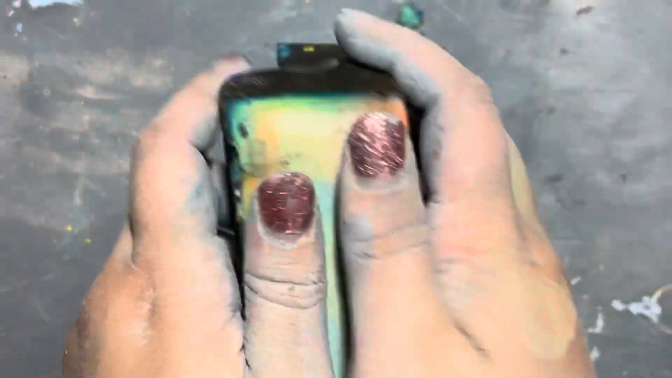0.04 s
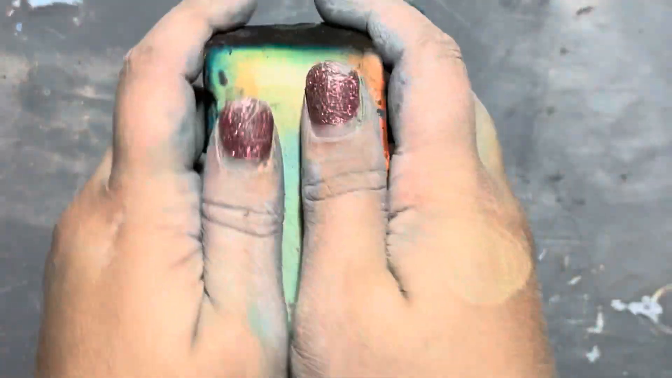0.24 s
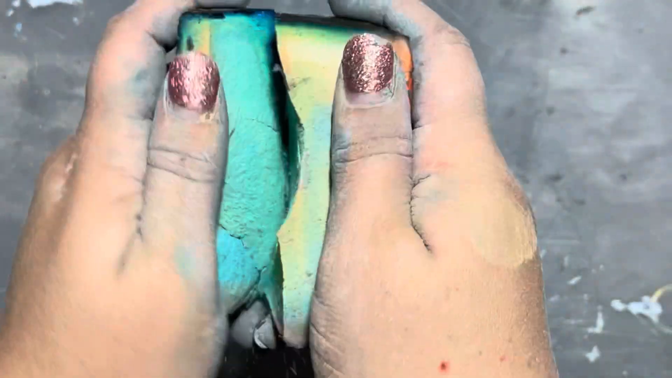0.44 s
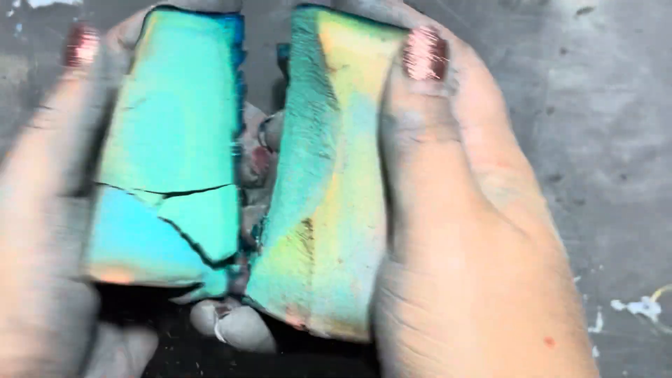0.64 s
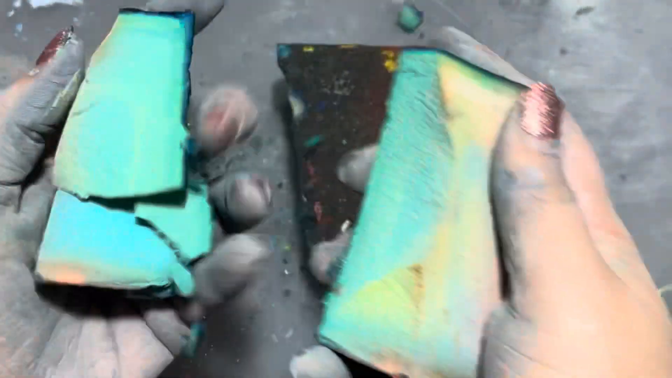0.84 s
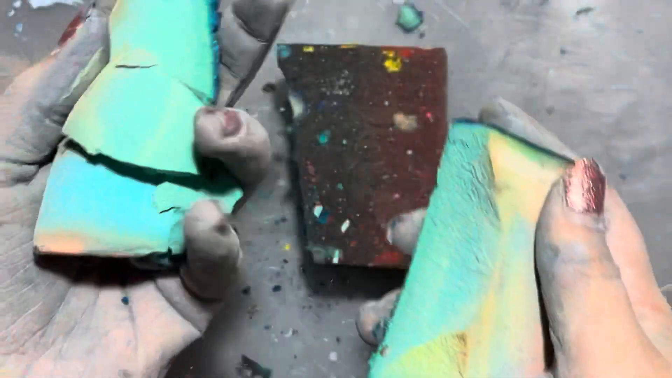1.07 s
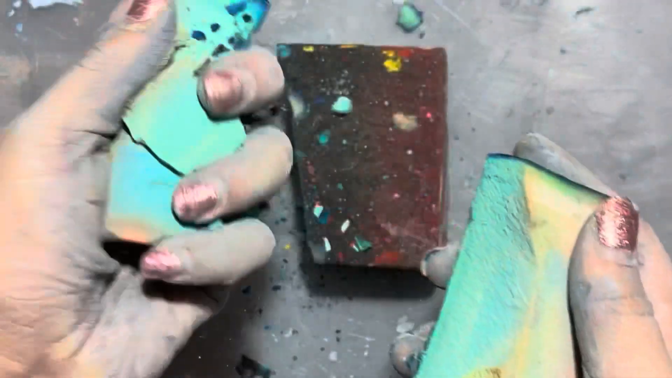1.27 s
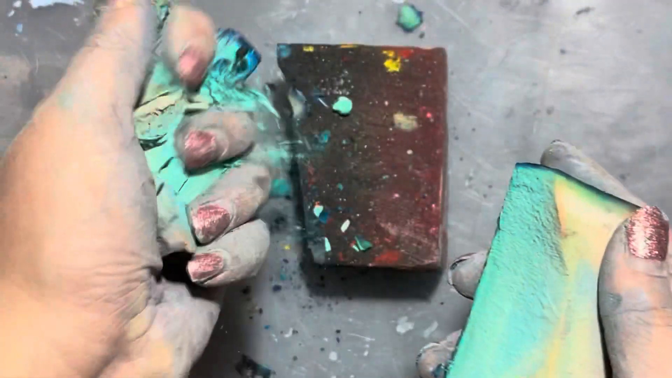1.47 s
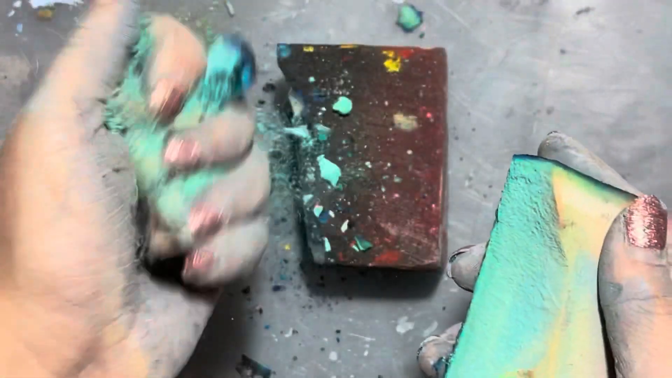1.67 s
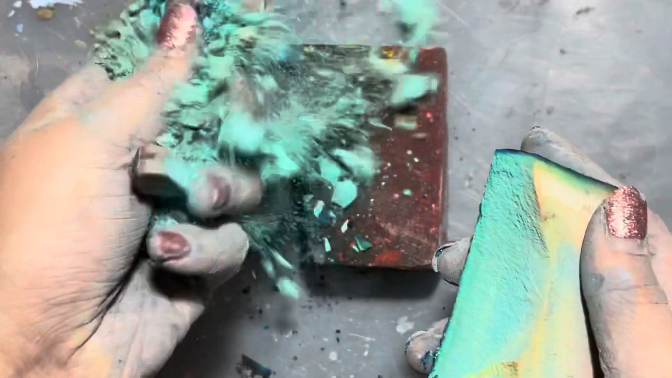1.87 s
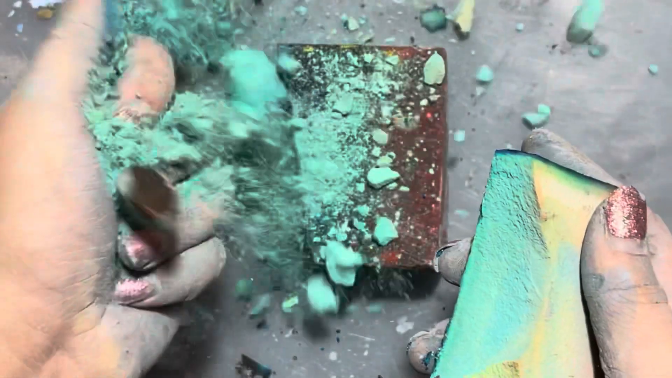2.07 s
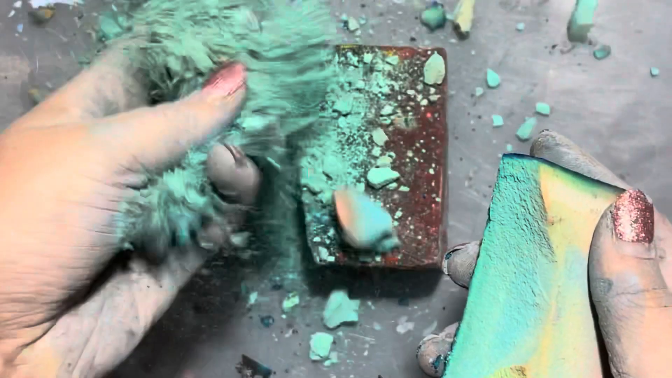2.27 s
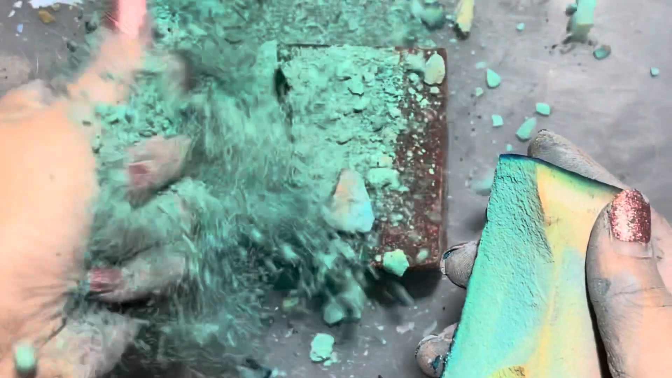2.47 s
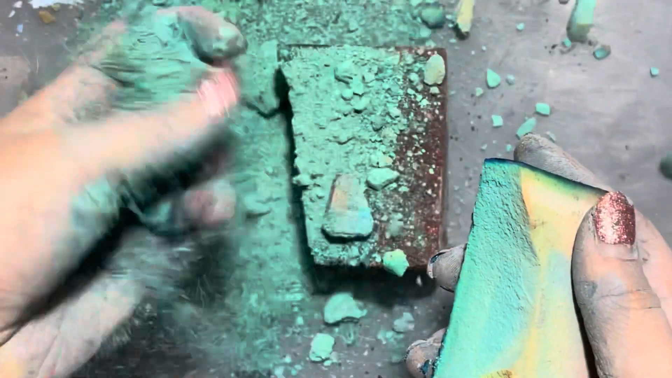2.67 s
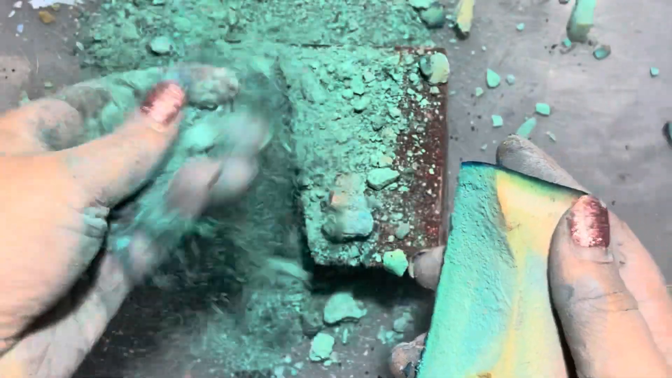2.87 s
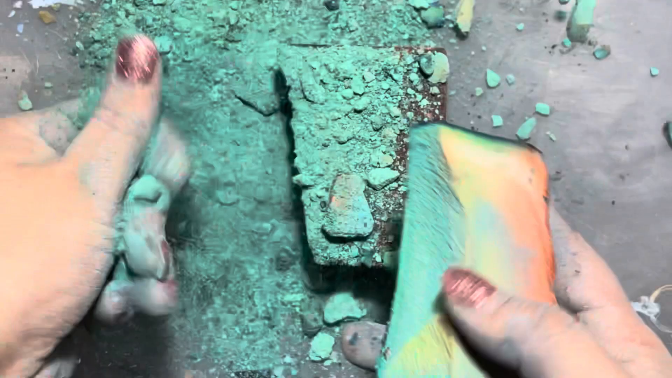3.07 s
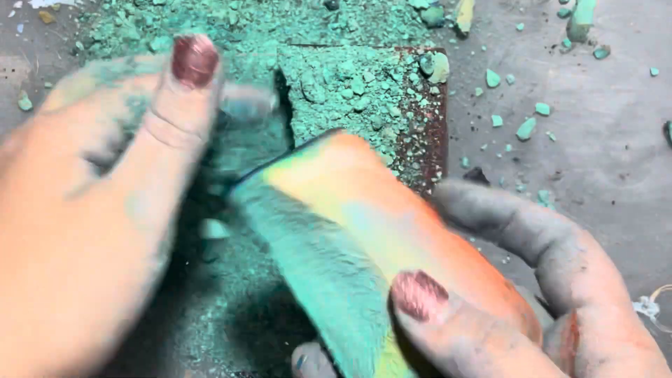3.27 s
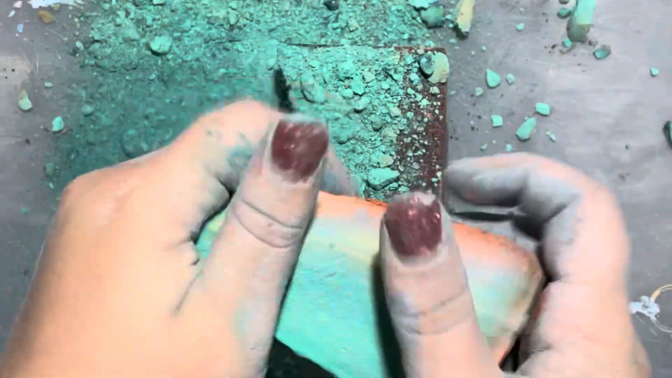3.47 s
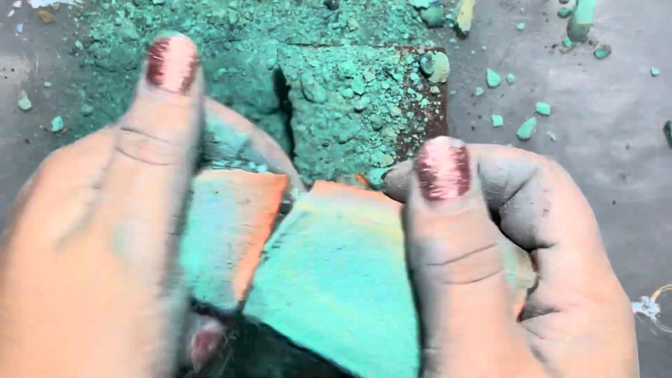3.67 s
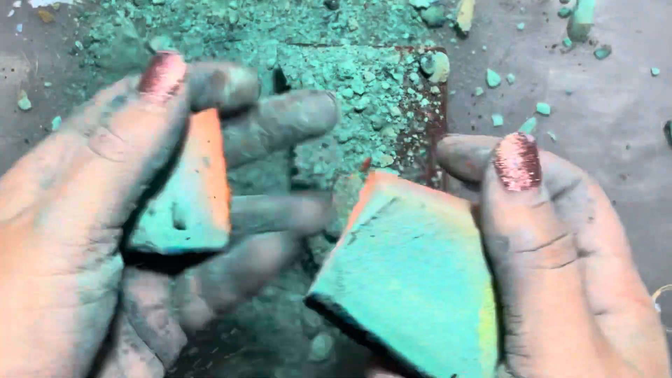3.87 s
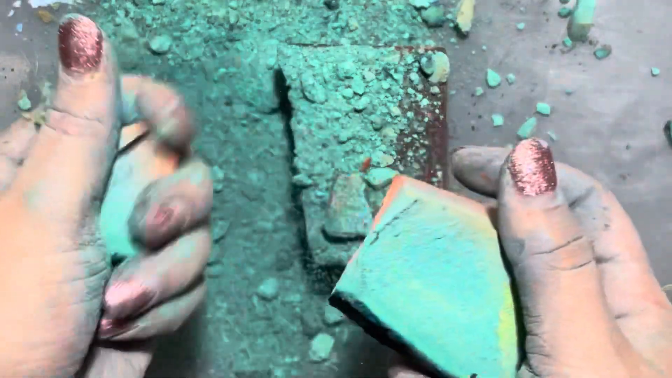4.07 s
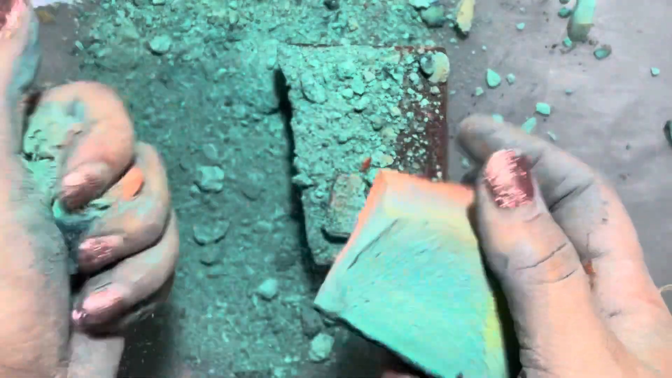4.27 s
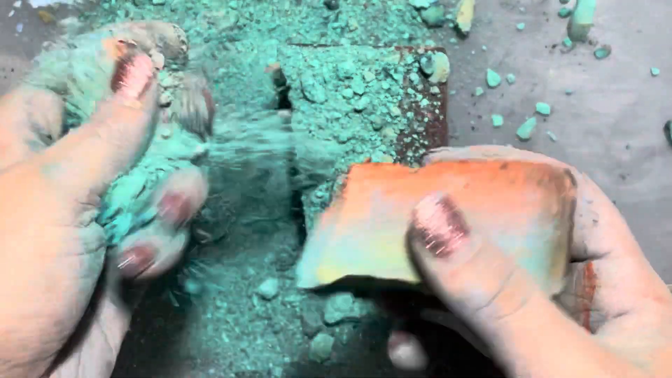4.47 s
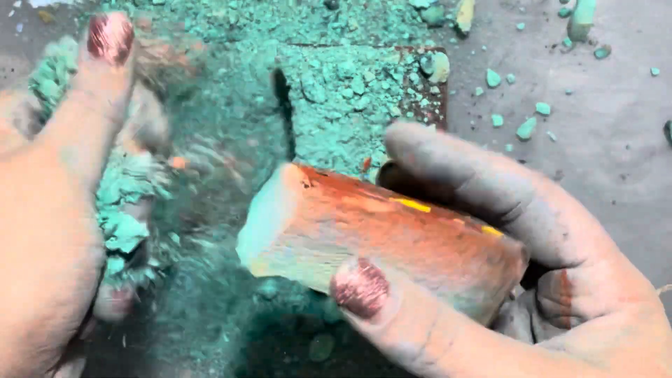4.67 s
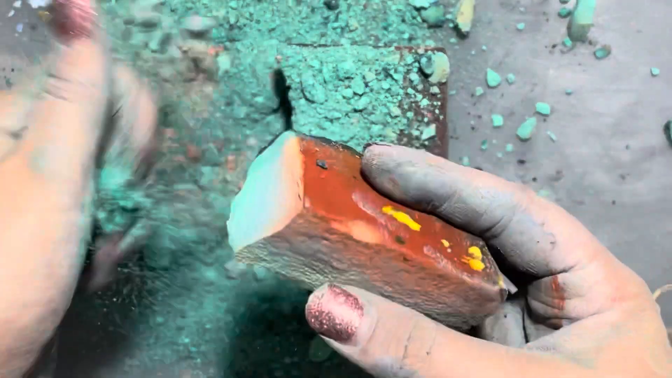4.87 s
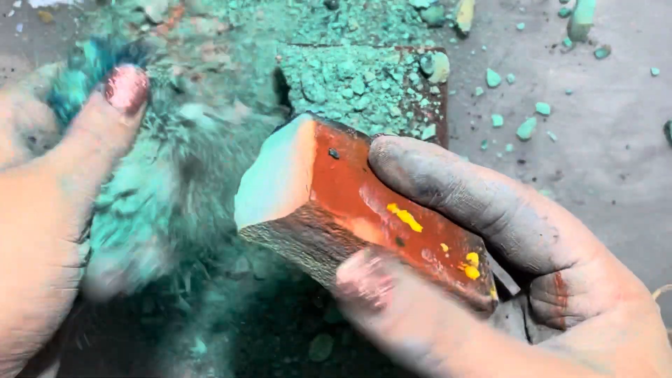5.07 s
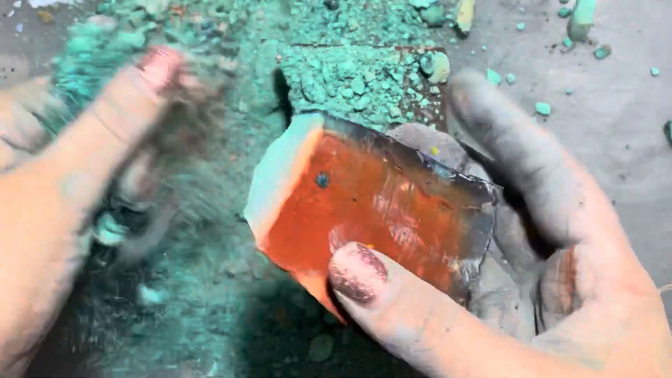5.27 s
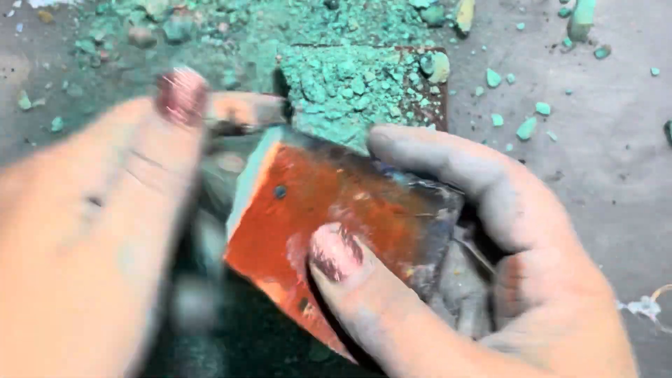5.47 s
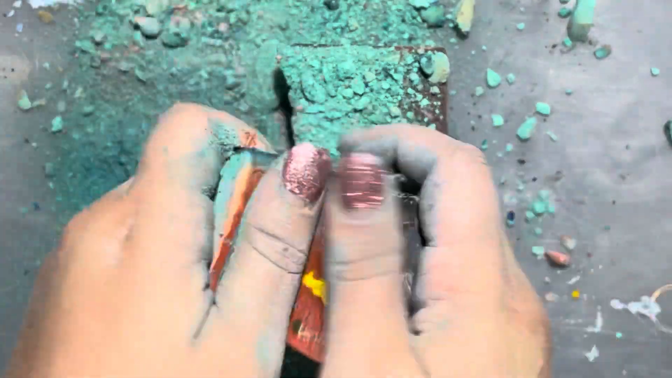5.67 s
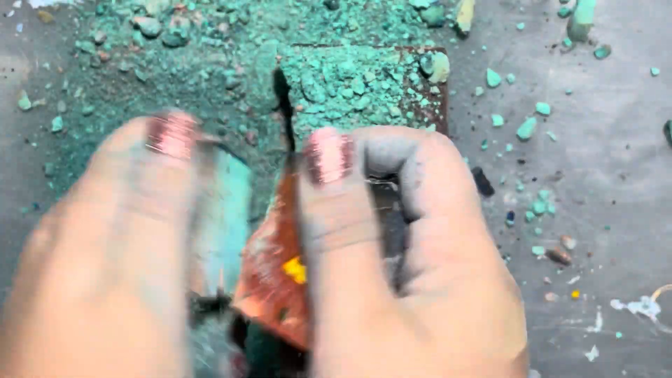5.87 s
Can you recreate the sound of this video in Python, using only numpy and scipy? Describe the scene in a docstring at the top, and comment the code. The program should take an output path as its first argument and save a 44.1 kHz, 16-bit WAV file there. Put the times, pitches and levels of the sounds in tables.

```python
"""A faint low hum and a squeaking swish of skin on chalk come first, then dry blocks snap and crush by hand.
It happens over a table, close to a phone in a small room. Each fracture is a short burst of tiny breaks that
rings the piece; lumps thump as low damped modes; crumbs patter and powder hisses as showers of random clicks;
fingers swish as shaped grain noise. The hum, a wavering sine with an octave, mostly sinks in pitch as it
grows louder on the whole."""
import sys
import numpy as np
from scipy import signal
from scipy.fft import rfft, irfft, next_fast_len
from scipy.io import wavfile
from scipy.ndimage import uniform_filter1d

SR = 44100
rng = np.random.default_rng(int(sys.argv[2]) if len(sys.argv) > 2 else 0)


def log_audio(samples):
    """Write samples as a 16-bit WAV file to the path given in sys.argv[1]."""
    # one column per channel
    frames = np.atleast_2d(samples).T
    # limit to full scale, then quantise
    limited = np.clip(frames, -1, 1)
    pcm = np.round(limited * 32767).astype(np.int16)
    wavfile.write(sys.argv[1], SR, pcm)


N = 261072
TIME = np.arange(N) / SR


def undb(db):
    """Decibels to gain."""
    return 10 ** (np.asarray(db) / 20)


def unit(x):
    """The same sound at rms 1."""
    return x / np.sqrt(np.mean(x ** 2) + 1e-30)


def strength(sound, db):
    """Scale a short sound so that its energy, spread over 10 ms, has this level."""
    return sound * undb(db) * np.sqrt(0.01 * SR / np.sum(sound ** 2))


def curves(table):
    """Every column of a table of (s, value, ..) rows, sample by sample."""
    s, *columns = np.transpose(table)
    return [np.interp(TIME, s, c) for c in columns]


def add(track, s, sound):
    """Mix a sound into the track at time s."""
    start = max(int(s * SR), 0)
    track[start:start + len(sound)] += sound[:max(N - start, 0)]


def colour(x, spectrum, ring_hz=1000, ring_db=0, ring_octaves=0.23, size=2048):
    """Causal minimum-phase filter with the given spectrum and one optional resonance."""
    octave = np.log2(np.maximum(np.arange(size // 2 + 1) * SR / size, 1))
    hz, db = np.transpose(spectrum)
    base = np.interp(octave, np.log2(hz), db)
    resonance = ring_db / (1 + ((octave - np.log2(ring_hz)) / ring_octaves) ** 2)
    # folding the cepstrum forward in time makes the response causal
    cepstrum = irfft(np.log(undb(base + resonance)))
    cepstrum[1:size // 2] *= 2
    cepstrum[size // 2 + 1:] = 0
    response = irfft(np.exp(rfft(cepstrum)))
    return signal.fftconvolve(x, response)[:len(x)]


def walk(rate):
    """Smooth random wander with a spread near 1, taking this many steps per second."""
    steps = rng.standard_normal(N // 20)
    held = steps[(TIME * rate).astype(int)]
    return 1.3 * uniform_filter1d(held, max(int(SR / rate), 1))


def grains(rate, spread_db):
    """Random clicks, this many per second on average, many small and a few large."""
    chance = rng.random(N)
    size = np.minimum(rng.exponential(size=N), 4)
    sign = rng.choice([-1, 1], N)
    return unit((chance < rate / SR) * undb(spread_db * size) * sign)


def gesture(start, length, attack_s, release_s, sag_db_per_s):
    """Rise to full strength at the start, sag slowly while held, then die away."""
    since = TIME - start
    rise = np.exp(-(np.minimum(since, 0) / attack_s) ** 2)
    sag = undb(-sag_db_per_s * np.clip(since, 0, length))
    release = np.exp(-np.maximum(since - length, 0) / release_s)
    return rise * sag * release


# Spectrum of the empty room. Each row: frequency in Hz, level in dB per Hz.
ROOM_TONE = [(20, 0.5), (45, -13), (70, -10.5), (100, -1.5), (200, -17.5), (400, -27.5), (900, -51.5),
             (2500, -48), (11000, -39), (13000, -55), (16000, -86)]


def room_tone():
    """A steady noise bed: random noise through the room's own spectrum."""
    return unit(colour(rng.standard_normal(N), ROOM_TONE)) * undb(-68)


# The hum's glide. Each row: time in seconds, pitch in Hz, level in dB before the trim.
HUM = [(0.1, 72.1, -68), (2.14, 71.57, -57), (3.08, 70.8, -60), (3.97, 68.9, -54.5), (4.06, 68.6, -59),
       (4.67, 67.33, -48), (5.79, 66.9, -45.5), (5.92, 68.4, -46)]


def hum(trim_db=-1, beat_hz=64.2, beat_db=-68, second_db=-20):
    """A low hum with a weak octave, unsteady in pitch and level; a fainter steady tone beats against it."""
    hz, db = curves(HUM)
    phase = 2 * np.pi * np.cumsum(hz + 0.78 * walk(19)) / SR
    level = undb(db + trim_db + 0.88 * walk(6.5))
    tone = (np.sin(phase) + undb(second_db) * np.sin(2 * phase)) * level
    steady = undb(beat_db) * np.sin(2 * np.pi * beat_hz * TIME)
    return np.sqrt(2) * (tone + steady)  # sine levels count as rms


# Spectrum of broken chalk pieces. Each row: frequency in Hz, level in dB per Hz.
BODY = [(100, 0.5), (300, -11.5), (700, 0), (1300, -2.5), (2400, -1.5), (3800, -5.5), (5000, -15),
        (9000, -59), (16000, -95)]


def chips(rate=130, low_hz=700, high_hz=4500, spread_db=4.5, size=1024):
    """Single chips break off at random moments, each with a pitch of its own."""
    out, t = np.zeros(N), np.arange(size) / SR
    for when, pitch, weight in rng.random((int(rate * N / SR), 3)):
        hz = low_hz * (high_hz / low_hz) ** pitch
        burst = rng.standard_normal(size) * np.exp(-t / 0.0015)
        tick = colour(burst, BODY, hz, ring_db=13, size=512)
        # few chips are loud, and high ones are weaker
        db = -spread_db * np.log(weight + 0.071) - 4 * pitch
        add(out, when * N / SR, strength(tick, db))
    return unit(out)


def crumbs(spectrum, low_hz, high_hz, rate, spread_db, ring_db, flicker_db, count=6):
    """Crumbs of several sizes; each size clicks at its own pitch and comes in its own flurries."""
    total = np.zeros(N)
    for hz in np.geomspace(low_hz, high_hz, count):
        flurries = grains(rate / count, spread_db) * undb(flicker_db * walk(110))
        total += colour(flurries, spectrum, hz, ring_db)
    return unit(total)


# Spectra of crumbs on the table, crunching crumbs and hissing powder.
# Each row: frequency in Hz, level in dB per Hz.
PATTER = [(60, -1.5), (110, 1.5), (220, -2.5), (400, -9), (600, -14), (1500, -19), (16000, -72)]
CRUNCH = [(150, -4), (450, -11), (800, -0.5), (1350, 7), (1650, 6), (2100, 9), (3000, 1.5), (4200, -1),
          (6000, -7), (16000, -74)]
POWDER = [(600, -50), (2500, 6.5), (4500, 3), (5600, 3), (6400, 3), (7400, 3), (8500, 4), (11000, 10),
          (11700, -0.5), (12500, -24), (14000, -39), (16000, -68)]
# Squeezes of the hand. Each row: start in seconds, length in seconds, crunch level in dB and
# powder level in dB, both before the layer trims.
SQUEEZES = [(0.031, 0.13, -65, -57), (.33, 0.052, -69.5, -59.5), (.57, 0.094, -69.5, -70.5),
            (0.801, 0.11, -70.5, -63.5), (0.981, .13, -72, -62), (1.17, 0.063, -69, -57),
            (1.328, .1, -63.5, -53.5), (1.471, 0.11, -59, -55.5), (1.712, 0.046, -59, -59),
            (1.839, 0.26, -55.5, -55.5), (2.15, 0.072, -56, -60), (2.282, .12, -57, -55.5),
            (2.49, 0.093, -55, -56), (2.6, 0.091, -61, -65), (2.79, 0.13, -62.5, -63),
            (2.971, .16, -59, -62.5), (3.279, 0.056, -59.5, -55.5), (3.461, 0.037, -64, -65),
            (3.651, 0.17, -75, -68), (4.06, 0.099, -66, -59), (4.19, .13, -68.5, -61),
            (4.361, 0.17, -62.5, -54), (4.58, .31, -59.5, -56), (5.019, 0.13, -55.5, -54.5),
            (5.22, 0.081, -61, -60.5), (5.401, 0.039, -57.5, -55.5), (5.55, 0.13, -63, -54.5),
            (5.73, 0.052, -64.5, -59.5), (5.86, .06, -60, -59)]
# Crumbs pouring on the table. Each row: start in seconds, length in seconds, level in dB before the trim.
POURS = [(.06, 0.41, -66), (.6, 0.05, -68.5), (1.719, .02, -59.5), (1.92, 0.354, -48.5),
         (2.35, 0.35, -56.5), (2.76, 0.13, -60.5), (3.26, 0.066, -52.5), (4.62, 0.32, -61),
         (5.039, .22, -55.5), (5.41, 0.033, -50.5), (5.57, 0.07, -56.5)]


def crumbling(resting_crunch_db=-84.5, resting_powder_db=-73.5, spill_db=-9.5):
    """Each squeeze grinds in small fits: crumbs crunch, chips tick, powder hisses; what falls patters."""
    crunching, rubbing = undb(resting_crunch_db), undb(resting_powder_db)
    for start, length, crunch_db, powder_db in SQUEEZES:
        grip = gesture(start, length, attack_s=0.033, release_s=0.047, sag_db_per_s=6)
        crunching = np.maximum(crunching, grip * undb(crunch_db))
        rubbing = np.maximum(rubbing, grip * undb(powder_db))
    # some of whatever is crunched spills at once
    falling = crunching * undb(spill_db)
    for start, length, db in POURS:
        pour = gesture(start, length, attack_s=0.027, release_s=0.065, sag_db_per_s=8)
        falling = np.maximum(falling, undb(db) * pour)

    fits = walk(60)  # crunch and hiss surge together
    patter = crumbs(PATTER, 77, 500, rate=830, spread_db=2, ring_db=2.5, flicker_db=1)
    meal = crumbs(CRUNCH, 870, 4000, rate=2600, spread_db=3, ring_db=9, flicker_db=3)
    powder = crumbs(POWDER, 3600, 11500, rate=12000, spread_db=2.8, ring_db=9, flicker_db=3)
    crunch = meal * undb(3.1 * fits) + chips() * undb(-0.5)

    patter_layer = patter * falling * undb(-4)
    crunch_layer = crunch * crunching * undb(-8.5)
    powder_layer = powder * rubbing * undb(-4.5 + 2.25 * fits)
    return patter_layer + crunch_layer + powder_layer


# Spectrum of skin on chalk. Each row: frequency in Hz, level in dB per Hz.
SWISH = [(300, -12), (1500, -24), (2500, -7), (3600, -10.5), (4800, -4), (6000, -4.5), (7300, 0.5),
         (8500, 3.5), (11200, 5.5), (12200, -6), (13500, -20), (16000, -24)]
# Skin sliding over a chalk face. Each row: loudest moment in seconds, level there in dB,
# length in seconds between the points 10 dB down, squeak in Hz, squeak boost in dB.
SWISHES = [(0.054, -55, 0.057, 3660, 25), (0.135, -46, 0.024, 7100, -6), (0.646, -61, 0.055, 6000, 14),
           (0.747, -59, 0.046, 10300, 10), (0.84, -54, 0.035, 6460, 7), (1.125, -52.5, .022, 10500, -6),
           (1.887, -48.5, 0.033, 5990, 22), (3.057, -55.5, 0.17, 3720, 16), (3.311, -49.5, .022, 5320, 15),
           (3.407, -58, 0.028, 7500, 14), (3.477, -54.5, 0.051, 7300, 5), (3.754, -53, .026, 7470, 13),
           (3.848, -56.5, 0.05, 5710, 13), (4.293, -56.5, .07, 3400, 8), (4.766, -51, 0.08, 4410, 14),
           (5.23, -42, 0.068, 10100, -0.5), (5.507, -40, 0.048, 11000, 1.5), (5.62, -41.5, 0.038, 7160, 5)]


def swishes(shape=1.37, catch_db=3, squeak_octaves=0.034):
    """Skin drags over countless fine grains, catching a little, with a narrow squeak resonance on the way."""
    out = np.zeros(N)
    drag = grains(rate=13000, spread_db=1.5) * undb(catch_db * walk(210))
    for s, db, length, hz, squeak_db in SWISHES:
        span = np.abs(TIME - s) < 0.2
        fade_db = 10 * np.abs(2 * (TIME[span] - s) / length) ** shape
        rub = unit(colour(drag[span], SWISH, hz, squeak_db, squeak_octaves))
        out[span] += undb(db - fade_db) * rub
    return out


# What a thump rings with. Each row: multiple of its pitch before detuning, level in dB, t60 in seconds.
THUMP_MODES = [(0.683, -8, 0.11), (1.001, 2, 0.063), (1.45, -0.5, 0.065), (2.1, -9, 0.051),
               (2.9, -19, 0.091)]
# A block giving way or a lump landing. Each row: start in seconds, ring level in dB, pitch in Hz.
THUMPS = [(0.339, -41.5, 141.4), (.339, -47, 251), (.998, -61, 227), (1.328, -67, 288), (1.404, -59, 208),
          (1.896, -54.5, 337), (1.999, -39.5, 135), (2.021, -39, 128), (2.067, -49, 165),
          (2.141, -40.5, 365), (2.145, -46, 198), (2.27, -40.5, 147.5), (2.315, -47, 129),
          (2.553, -48, 226), (3.073, -56, 364), (3.243, -41.5, 238), (3.256, -45, 149), (3.325, -50, 240),
          (3.586, -52, 272), (4.083, -61, 300), (4.125, -56.5, 205), (4.599, -58.5, 236), (4.892, -49, 242),
          (5.429, -54, 232), (5.852, -40, 290)]


def thumps(push_s=0.0015, thud_db=-7, thud_s=0.0059, ring_db=9, size=8192):
    """A soft blow sets a few low, quickly damped modes going; the crumbling contact adds a rough thud."""
    out, t = np.zeros(N), np.arange(size) / SR
    push = 1 - np.exp(-t / push_s)
    for s, db, hz in THUMPS:
        ring = np.zeros(size)
        for multiple, mode_db, t60 in THUMP_MODES:
            mode_hz = hz * multiple * (1 + 0.02 * rng.standard_normal())
            ring += undb(mode_db - 60 * t / t60) * np.sin(2 * np.pi * mode_hz * t)
        contact = rng.standard_normal(size) * push * np.exp(-t / thud_s)
        thud = colour(contact, PATTER, hz, ring_db)
        add(out, s, strength(ring * push, db) + strength(thud, db + thud_db))
    return out


# Spectra of the bright snap and of tumbling pieces. Each row: frequency in Hz, level in dB per Hz.
TREBLE = [(500, -71), (2500, -2), (4500, 8), (5600, 9.5), (6400, 6.5), (7400, 10), (8500, 12), (11000, 13),
          (12200, 3.5), (13500, -22), (16000, -12)]
RUBBLE = [(100, -41), (280, -4), (420, 6), (560, -6.5), (800, 5.5), (1300, 5.5), (1700, -3.5), (2400, -9.5),
          (4000, -40.5), (16000, -47)]
# Snaps and knocks of chalk. Each row: start in seconds, body level in dB, treble level in dB,
# ring of the piece in Hz, decay time of the running fracture in seconds.
CRACKS = [(0.3358, -46.5, -41.5, 1540, 0.0024), (.393, -64, -57, 2440, 0.0034),
          (.5121, -68.5, -59.5, 1540, 0.00074), (0.7519, -64, -66, 1330, .0013),
          (0.806, -67, -54.5, 2440, 0.0037), (0.9953, -50.5, -53.5, 950, 0.0019),
          (1.038, -56.5, -52.5, 4020, 0.00075), (1.146, -59.5, -62, 3000, 0.0011),
          (1.188, -58, -45.5, 3820, .0026), (1.221, -51.5, -45.5, 2540, 0.0068),
          (1.3271, -49, -49, 1900, 0.0013), (1.3373, -63, -49.5, 1240, .0028),
          (1.4024, -59.5, -47.5, 1900, .002), (1.412, -53, -50.5, 3620, 0.0006),
          (1.4347, -70, -50, 3520, 0.0013), (1.4806, -45.5, -47, 2550, 0.0022),
          (1.7374, -49, -63, 1500, 0.0065), (1.8548, -55, -49, 2150, 0.008), (1.8907, -45, -61, 1300, .005),
          (1.9948, -67, -42.5, 1510, 0.0028), (2.024, -47.5, -62, 1570, 0.0019),
          (2.051, -47, -60, 1290, 0.0024), (2.138, -41.5, -62, 1170, 0.0032),
          (2.231, -58.5, -57, 720, 0.002), (2.2664, -72, -53, 828, .003), (2.4714, -39, -53, 1400, 0.0019),
          (2.5204, -52.5, -55, 2500, .001), (2.5339, -49, -70, 1160, 0.0053),
          (2.5521, -48, -72, 1710, 0.0046), (2.56, -47, -74, 835, 0.0033), (2.6752, -49, -56, 1630, 0.0013),
          (2.7549, -60, -71, 855, 0.011), (2.7894, -64.5, -58.5, 2450, .0072),
          (2.9861, -53.5, -59, 1300, 0.00092), (3.0008, -58.5, -75, 810, 0.0024),
          (3.0742, -45, -55, 2000, 0.0054), (3.2402, -38.5, -57, 1200, 0.00073),
          (3.2785, -57.5, -74, 700, 0.0027), (3.327, -50, -56.5, 814, 0.0029),
          (3.563, -63.5, -62, 2240, 0.00048), (3.5871, -37.5, -36, 2160, 0.0028),
          (4.0743, -55, -53, 2400, 0.0049), (4.0802, -49, -50.5, 1700, 0.0014),
          (4.121, -49, -49, 2160, 0.0028), (4.4446, -81, -44, 3880, 0.0033),
          (4.6862, -57, -54, 2470, .0015), (4.8912, -59, -72, 1012, 0.0043),
          (5.0186, -61, -55, 980, 0.0034), (5.037, -49, -59, 1500, .0008),
          (5.1203, -58.5, -58, 1080, .0052), (5.3681, -63.5, -70, 1450, .0018),
          (5.412, -52.5, -69, 960, 0.0029), (5.4254, -52.5, -68, 1161, .0023),
          (5.5579, -77, -44, 3570, .0042), (5.5805, -54.5, -71, 950, .0017),
          (5.6075, -51.5, -50, 2870, 0.015), (5.8512, -28, -25, 2020, 0.0015),
          (5.8786, -51, -45, 1780, 0.0015)]


def cracks(ring_db=10, ring_octaves=0.24, size_shift=0.38, rise_s=0.00058, jag_db=4,
           dust_db=-18, dust_s=0.011, rubble_db=-8, rubble_cycles=14, size=4096):
    """A fracture runs as a jagged burst of tiny breaks, rings the piece, sheds dust and lets rubble tumble."""
    out, t = np.zeros(N), np.arange(size) / SR
    for s, body_db, treble_db, hz, run_s in CRACKS:
        low, high, loose, jag = rng.standard_normal((4, size))
        attack = (1 - np.exp(-(t / rise_s) ** 2)) * undb(jag_db * jag)
        burst = attack * (np.exp(-t / run_s) + undb(dust_db) * np.exp(-t / dust_s))
        # a small piece rings higher, and its whole spectrum moves up with it
        piece = np.array(BODY) * [(hz / 1700) ** size_shift, 1]
        body = colour(low * burst, piece, hz, ring_db, ring_octaves)
        add(out, s, strength(body, body_db))
        add(out, s, strength(colour(high * burst, TREBLE), treble_db))
        # the lower a piece rings the heavier it is: its rubble is louder and settles more slowly
        tumble = loose * attack * np.exp(-t * hz / rubble_cycles)
        weight_db = -5 * np.log2(hz / 1300)
        add(out, s, strength(colour(tumble, RUBBLE), body_db + rubble_db + weight_db))
    return out


def reflections(t60, db, delay_s, size=16384):
    """Dense echoes that start after a delay and die away, with this total energy in dB."""
    t = np.arange(size) / SR
    tail = rng.standard_normal(size) * undb(-60 * t / t60) * (t > delay_s)
    return tail * undb(db) / np.sqrt(np.sum(tail ** 2))


# Lead of the left microphone port over the right. Each row: frequency in Hz, phase in radians.
PORT_LEAD = [(0, 0), (120, -.02), (400, -.25), (1150, -.35), (1500, 0), (1900, .1), (2700, .7), (4000, .7),
             (4500, 1.5), (5200, 5.3), (5600, 6.2), (6100, 6.4), (8500, 9.1), (9400, 9.6), (12200, 12.5),
             (13700, 12.6), (15300, 15.7)]


def ports(x):
    """Two microphone ports hear the same sound with a lag that depends on frequency."""
    padded = next_fast_len(N + 2048)
    spectrum = rfft(x, padded)
    lead = np.interp(np.arange(len(spectrum)) * SR / padded, *np.transpose(PORT_LEAD))
    # each side takes half the lead
    return np.array([irfft(spectrum * np.exp(side * 0.5j * lead), padded)[:N] for side in (1, -1)])


# Spectrum of the far walls' answer. Each row: frequency in Hz, level in dB per Hz.
FAR_WALLS = [(60, -36.5), (130, -12), (280, 7), (700, 10), (1300, 2), (2500, -11.5), (8000, -16),
             (16000, -20)]


def far_answer(chalk):
    """The far walls answer from all sides, so each port gets its own random echoes."""
    far = colour(chalk, FAR_WALLS)
    sides = [signal.fftconvolve(far, reflections(t60=0.17, db=-15, delay_s=0.00295))[:N] for _ in range(2)]
    return np.array(sides)


def scene():
    """Chalk close by, quick echoes off hands and table, a faint room tail, hum and room tone."""
    chalk = crumbling() + swishes() + thumps() + cracks()
    close_echoes = reflections(t60=0.035, db=-15, delay_s=0.001)
    room_tail = reflections(t60=0.21, db=-18, delay_s=0.0028)
    near = chalk + signal.fftconvolve(chalk, close_echoes + room_tail)[:N]
    return ports(near + hum() + room_tone()) + far_answer(chalk)


def record(dry):
    """The phone drops the deepest bass and cuts the top."""
    bass_cut = signal.butter(3, 42, "highpass", fs=SR, output="sos")
    top_cut = signal.ellip(8, 0.2, 70, 15600, fs=SR, output="sos")
    return signal.sosfilt(top_cut, signal.sosfilt(bass_cut, dry))


dry = scene()
out = record(dry)
log_audio(out)
```